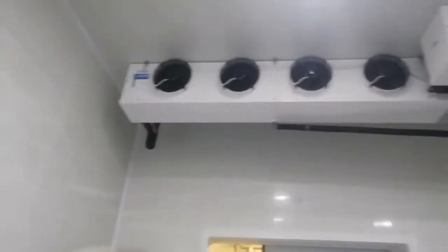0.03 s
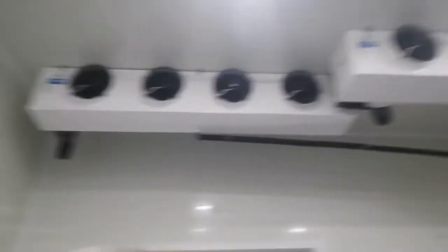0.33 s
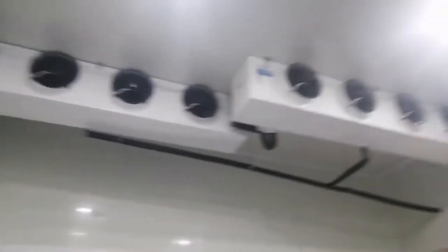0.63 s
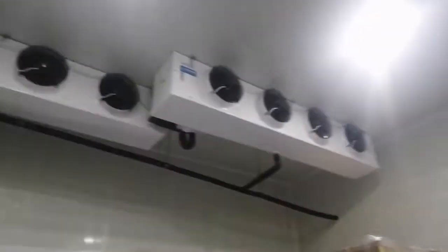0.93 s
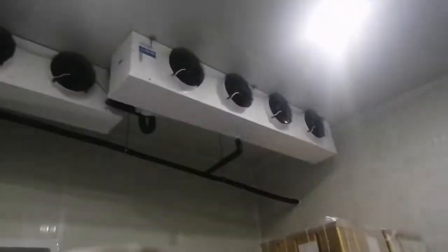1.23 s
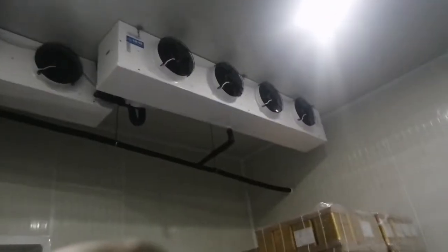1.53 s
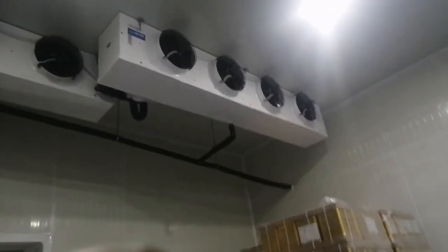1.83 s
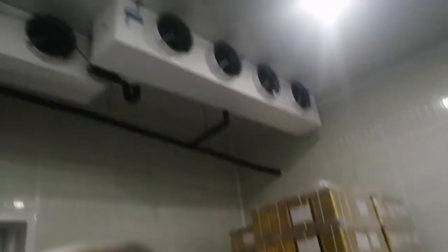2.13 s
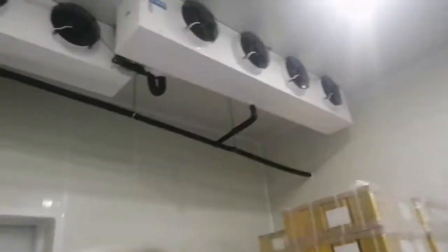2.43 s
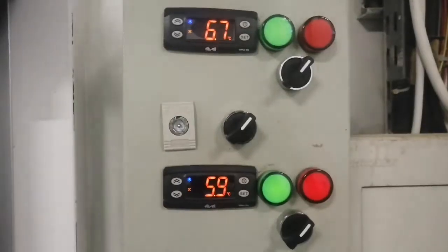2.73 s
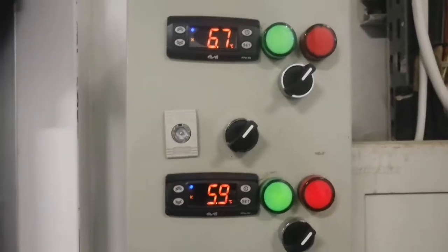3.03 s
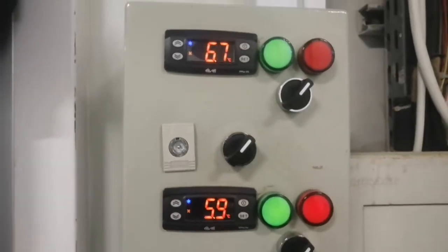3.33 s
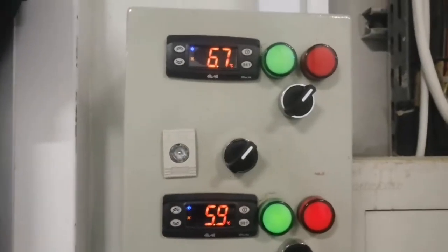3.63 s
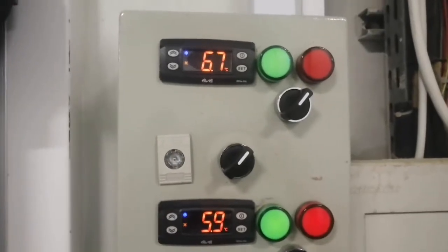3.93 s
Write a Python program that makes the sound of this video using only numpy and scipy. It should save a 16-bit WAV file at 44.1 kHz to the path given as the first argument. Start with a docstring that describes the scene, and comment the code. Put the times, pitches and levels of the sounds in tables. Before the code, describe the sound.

Ceiling cooling fans blow in a hard-walled cold room, a loud, wide rush over a throbbing hum. After a brief swish the sound cuts off. A much quieter hum and thin whine follow outside, by a control panel.

```python
"""Evaporator fans in a cold store

Rows of fans blow through a hard-walled room: turbulent air makes a wide rush, and the passing blades
a hum that throbs as the fans beat. After a brief swish the sound cuts off. A short silence later it
resumes outside, at the control panel: a much quieter beating hum, a thin whine and a soft rush
that settles lower."""
import sys
import numpy as np
from scipy import signal
from scipy.fft import rfft, irfft
from scipy.io import wavfile

SR = 44100
rng = np.random.default_rng(int(sys.argv[2]) if len(sys.argv) > 2 else 0)


def bounce(signal):
    """Save signal as a 16-bit WAV file at the path given by the first command-line argument."""
    frames = np.transpose(np.atleast_2d(signal))
    limited = np.clip(frames, -1, 1)
    pcm = np.round(limited * 32767).astype(np.int16)
    wavfile.write(sys.argv[1], SR, pcm)


N = 176400
TIME, FREQS = np.arange(N) / SR, np.fft.rfftfreq(N, 1 / SR)
CUT_S, RESUME_S = 2.49, 2.904

# gain of the rush, tones and whine at the panel (t/s, low/dB, middle/dB, treble/dB)
PANEL_GAINS = [(2.9, 3.5, 5.5, 0.5), (2.97, 2.5, 8.5, 4), (3.06, 1.5, 6, 2.5), (3.12, 3, 6.5, 2.5),
               (3.2, 3.5, 2.5, 0), (3.27, 2.5, 1, 0.5), (3.39, -1, 1.5, -0.7), (3.6, -1, 0.5, 0),
               (3.85, -1, 1, 0.5), (4, -3, 1, -1)]


def undb(db):
    """Amplitude ratio: tenfold for every 20 dB."""
    return 10 ** (np.asarray(db) / 20)


def curve(table, column=1):
    """Envelope: a table column interpolated linearly in time."""
    rows = np.array(table, float)
    return np.interp(TIME, rows[:, 0], rows[:, column])


def colour(table, column=1):
    """Spectral envelope: a table column interpolated in log frequency."""
    rows = np.array(table, float)
    return np.interp(np.log(FREQS + 1e-3), np.log(rows[:, 0]), rows[:, column])


def density_gain(spectrum):
    """Spectral shaping: left and right gains that give unit white noise the tabled power density."""
    return undb([colour(spectrum, 1), colour(spectrum, 2)]) * np.sqrt(SR / 2)


def bell(offset, width):
    """Gaussian window whose standard deviation is width."""
    return np.exp(-.5 * (offset / width) ** 2)


def walk(rate_hz):
    """Random modulation: low-passed noise of unit RMS."""
    slow = irfft(rfft(rng.standard_normal(N)) * bell(FREQS, rate_hz), N)
    return slow / np.sqrt(np.mean(slow ** 2))


def pan(db):
    """Interaural level difference: gains that put the left db above the right."""
    return undb(np.array([[1], [-1]]) * db / 2)


def pair(a, b, correlation):
    """Partial coherence: two independent signals mixed as mid and side into left and right."""
    c = np.clip(correlation, -1, 1)
    mid, side = a * np.sqrt((1 + c) / 2), b * np.sqrt((1 - c) / 2)
    return np.array([mid + side, mid - side])


def tone(hz, db, width_hz, correlation):
    """Interference: sources of nearly equal frequency sum to a tone that fades in and out."""
    phase = 2 * np.pi * hz * TIME
    a, b = (walk(width_hz / 2) * np.cos(phase) + walk(width_hz / 2) * np.sin(phase) for _ in range(2))
    return undb(db) * pair(a, b, correlation)


def hum(hz, drift, level_db):
    """Frequency modulation: one partial of a rotor, its pitch wandering by the fraction drift."""
    phase = 2 * np.pi * np.cumsum(hz * (1 + drift * walk(1.8))) / SR
    return np.sqrt(2) * undb(level_db) * np.sin(phase)


def air(spectrum, correlation, gain_db, flutter_db, ripple_db):
    """Turbulence: broadband noise in fluttering octave bands, each following gain_db(hz) in time."""
    a, b = rfft(rng.standard_normal((2, N)))
    noise = pair(a, b, colour(correlation)) * density_gain(spectrum)
    # wall echoes leave fine peaks and dips in the spectrum, deeper towards the treble
    spacing_hz, bins = 15, len(FREQS)
    ripple = np.interp(FREQS / spacing_hz, np.arange(bins), rng.standard_normal(bins))
    depth = colour([(200, 0.045), (800, 0.64), (6000, 1.0)])
    noise = noise * undb(ripple_db * depth * ripple)
    out = 0
    for hz in 30 * 2 ** np.arange(10):
        band = colour([(hz / 2, 0), (hz, 1), (hz * 2, 0)])
        out = out + irfft(noise * band, N) * undb(gain_db(hz) + flutter_db * walk(17))
    return out


def panel_gain_db(hz):
    """Spectral balance at the panel: the gain at hz, crossfaded between low, middle and treble."""
    edges_hz = [330, 1000, 3000, 6000]
    shapes = [1, 0, 0, 0], [0, 1, 1, 0], [0, 0, 0, 1]
    shares = [np.interp(np.log(hz), np.log(edges_hz), shape) for shape in shapes]
    return sum(share * curve(PANEL_GAINS, column) for column, share in enumerate(shares, 1))


def panel_rush():
    """Flow noise heard outside the store: a soft rush that settles lower."""
    # power density before the band gains (f/Hz, left/dB per Hz, right/dB per Hz)
    spectrum = [(25, -81, -80), (70.1, -76, -78), (171, -78, -83), (255, -75, -77), (390, -81.5, -80.5),
                (700, -83.5, -84), (1101, -88, -84), (1500, -93.5, -88.5), (2100, -95.5, -87),
                (3150, -91, -85.5), (4040, -101.5, -99.5), (4580, -99, -96), (5200, -91, -93.5),
                (7530, -102.0, -103.1), (10600, -109.7, -105.8), (14500, -114.9, -101.2)]
    # likeness of left and right (f/Hz, correlation)
    correlation = [(60, 1), (290, 0.93), (640, 0.86), (1400, 0), (3100, 0)]
    return air(spectrum, correlation, panel_gain_db, flutter_db=0.66, ripple_db=1)


def panel_machinery():
    """Tonal noise of rotating machines: a beating hum, its near octave, thin tones and a motor whine."""
    # beat envelope of the hum (t/s, level/dB)
    hum_level = [(2.91, -46), (2.954, -52), (2.982, -41), (3.006, -40), (3.052, -53), (3.076, -39),
                 (3.152, -63), (3.198, -38.5), (3.24, -53), (3.264, -43), (3.446, -58), (3.502, -42),
                 (3.576, -65), (3.604, -49), (3.638, -59), (3.658, -48), (3.734, -40), (3.836, -59),
                 (3.89, -45.5), (3.938, -61), (3.966, -54), (4.0, -59)]
    # envelope of its near octave (t/s, level/dB)
    octave_level = [(2.91, -54), (2.955, -59), (2.992, -47), (3.03, -57), (3.15, -52), (3.185, -59),
                    (3.225, -50), (3.272, -50), (3.33, -71), (3.43, -53.5), (3.55, -60), (3.77, -61),
                    (3.81, -50), (3.9, -66), (3.945, -52), (4.0, -56)]
    # machine tones before the band gains (f/Hz, level/dB, width/Hz)
    lines = [(131.8, -54.5, 6.8), (184, -66, 4.9), (256, -60, 8), (305, -65.5, 3.1), (355.5, -68, 3),
             (457, -68, 6.3), (857, -76, 2.5), (2800, -74, 4), (3042, -75, 4), (5146, -76, 7),
             (6040, -77, 3.6)]
    tones = sum(tone(hz, db + panel_gain_db(hz), width, correlation=0.82) for hz, db, width in lines)
    octave = hum(hz=231.5, drift=0.00955, level_db=curve(octave_level))
    whine = hum(hz=664, drift=0.0014, level_db=-64.5 + curve(PANEL_GAINS, column=2))
    fundamental = hum(hz=117.3, drift=0.0063, level_db=curve(hum_level))
    return fundamental * pan(db=-3.5) + (octave + tones + whine) * pan(db=-2.5)


def swells():
    """Amplitude modulation of narrow noise bands: brief surges in the rush of both places."""
    # surges (t/s, time spread/s, centre f/Hz, band spread/octaves, peak level/dB, correlation)
    surges = [(2.32, 0.024, 2720, .3, -34.5, 0.21), (2.342, 0.014, 1080, 0.12, -32.5, 0.73),
              (3.164, .02, 467, 0.14, -59, .9), (3.268, 0.045, 290, 0.56, -49, .95)]
    out = 0
    for at, spread, hz, octaves, db, correlation in surges:
        band = bell(np.log2((FREQS + 1e-3) / hz), octaves)
        a, b = irfft(rfft(rng.standard_normal((2, N))) * band, N)
        out = out + undb(db) * bell(TIME - at, spread) * pair(a, b, correlation) / np.std(a)
    return out


def swish():
    """A noise transient: one short, bright burst just before the cut."""
    # power density at the peak (f/Hz, left/dB per Hz, right/dB per Hz)
    spectrum = [(1000, -85, -88), (5000, -82.5, -76), (8000, -78, -81), (11000, -98, -97),
                (13960, -92, -81)]
    noise = irfft(rfft(rng.standard_normal((2, N))) * density_gain(spectrum), N)
    return bell(TIME - 2.481, width=0.0065) * noise


def room_rush():
    """Turbulent flow between hard walls: a wide rush whose treble shifts between left and right."""
    # power density before the gains (f/Hz, left/dB per Hz, right/dB per Hz)
    spectrum = [(25, -61, -69), (60.4, -75.5, -65.5), (95, -61, -62), (160, -56.5, -56),
                (293, -56.5, -64.5), (430, -61, -64.5), (620, -60.5, -63.5), (1050, -64, -62),
                (1550, -67, -64.5), (1740, -66, -62), (2180, -65.5, -62.5), (3220, -68.5, -69),
                (3990, -78, -74), (5270, -74.5, -69), (6140, -81.5, -81.5), (7840, -80, -91),
                (10500, -93.5, -93.5), (14500, -101.5, -93)]
    # likeness of left and right (f/Hz, correlation)
    correlation = [(30, 0.63), (95, 1), (170, 0.83), (290, 0.84), (640, 0.47), (1300, -0.1), (3100, -0.02)]
    # slight changes of the whole rush (t/s, gain/dB)
    overall_gain = [(0, -0.06), (.9, -0.07), (1.2, -.5), (1.5, 0.06), (1.9, -0.56), (2.15, 0), (2.49, -1)]
    # added gain of the treble, in full from 8 kHz up (t/s, left/dB, right/dB)
    treble_gain = [(0, -2, 0.5), (.5, -2, -0.7), (1.0, 0, 0), (1.6, 0.3, -0.7), (2.1, 1.5, -1),
                   (2.49, 0, -2.5)]
    treble_db = np.array([curve(treble_gain, 1), curve(treble_gain, 2)])
    gain_db = lambda hz: curve(overall_gain) + treble_db * np.interp(hz, [4500, 8000], [0, 1])
    return air(spectrum, correlation, gain_db, flutter_db=0.65, ripple_db=0.86)


def room_fans():
    """Blade-pass harmonics, beating as the fans run at unequal speeds, over faint motor tones."""
    # beat envelope of the fundamental (t/s, level/dB)
    hum_level = [(0.0, -34), (0.13, -27.5), (0.16, -31.5), (0.32, -27), (0.37, -31.5), (0.74, -30.5),
                 (0.79, -44), (0.85, -30.5), (0.97, -50), (1.01, -35.5), (1.09, -34), (1.17, -35.5),
                 (1.19, -38), (1.29, -31), (1.33, -33.5), (1.39, -29), (1.44, -26), (1.48, -33.5),
                 (1.54, -28.5), (1.96, -30.5), (2.02, -35.5), (2.3, -31.5), (2.33, -37.5), (2.38, -32.5),
                 (2.46, -27.5), (2.48, -37)]
    # its lean to the left (t/s, left minus right/dB)
    lean = [(0, -0.5), (.4, 1), (.85, 2.8), (1.5, 2), (2.05, 6.5), (2.3, 1.8), (2.49, 1)]
    # envelope of the second harmonic (t/s, level/dB)
    octave_level = [(0.0, -34), (0.22, -51), (0.4, -34.5), (0.59, -51), (0.61, -37.5), (0.72, -37.5),
                    (0.77, -49.5), (0.81, -36), (0.93, -43), (1.19, -35), (1.24, -57), (1.5, -52),
                    (1.55, -58), (1.61, -34), (1.7, -36), (1.86, -42.5), (1.95, -37), (2.18, -41),
                    (2.36, -38.5), (2.48, -34)]
    # envelope of the third harmonic (t/s, level/dB)
    third_level = [(0, -40.5), (.15, -40), (.22, -52), (.33, -40), (.47, -41.5), (.55, -51), (.72, -42.5),
                   (1.1, -40), (1.22, -52), (1.5, -47), (1.68, -53), (1.85, -46), (2.13, -38), (2.23, -54),
                   (2.48, -44.5)]
    # higher harmonics (multiple of the blade-pass rate, level/dB)
    harmonics = [(4, -47.5), (5, -51)]
    # motor tones (f/Hz, level/dB, width/Hz)
    motor_lines = [(93.9, -56, 4.5), (192.9, -47.5, 5.9)]
    blade_hz, spread_hz = 122.34, 1.85  # blade-pass rate and its spread among the fans
    fundamental = hum(blade_hz, drift=0.002, level_db=curve(hum_level))
    octave = hum(2 * blade_hz, drift=0.002, level_db=curve(octave_level))
    third = hum(3 * blade_hz, drift=0.00702, level_db=curve(third_level))
    upper = sum(tone(k * blade_hz, db, k * spread_hz, correlation=1) for k, db in harmonics)
    motors = sum(tone(hz, db, width, correlation=1) for hz, db, width in motor_lines)
    return fundamental * pan(curve(lean)) + (octave + third + upper) * pan(db=3.5) + motors


def scene():
    """Superposition of the sources: the room, a hard cut to silence, then the panel."""
    room = room_fans() + room_rush() + swish()
    panel = panel_machinery() + panel_rush()
    return room * (TIME < CUT_S) + panel * (TIME > RESUME_S) + swells()


def record(dry):
    """Band limiting: a steep elliptic low-pass removes the highest treble."""
    top_hz = 15400
    return signal.sosfilt(signal.ellip(10, .2, 80, top_hz, fs=SR, output="sos"), dry)


dry = scene()
out = record(dry)
bounce(out)
```